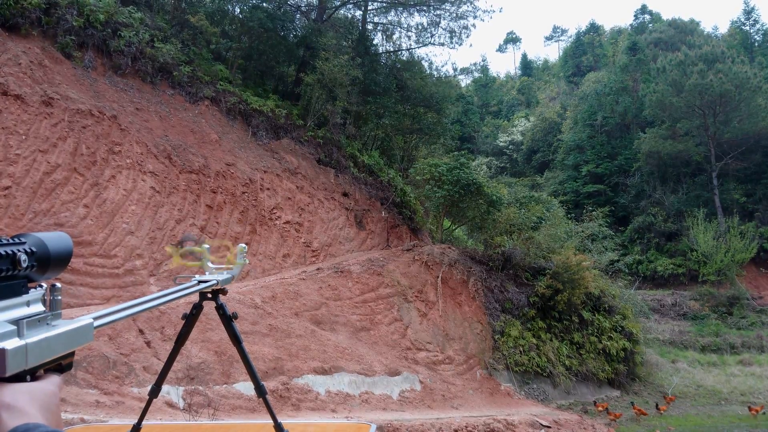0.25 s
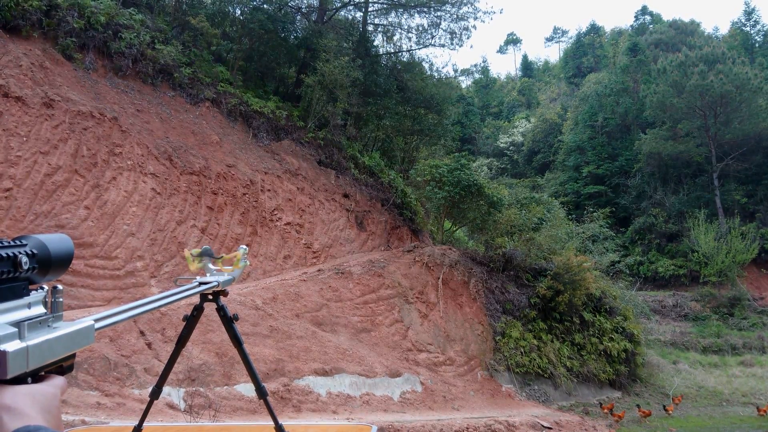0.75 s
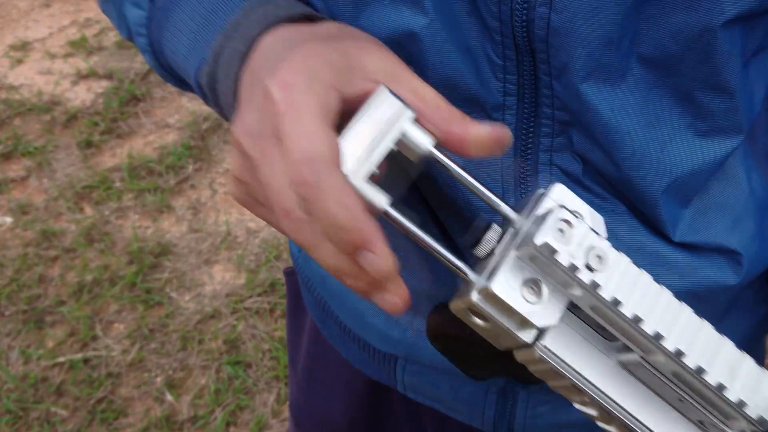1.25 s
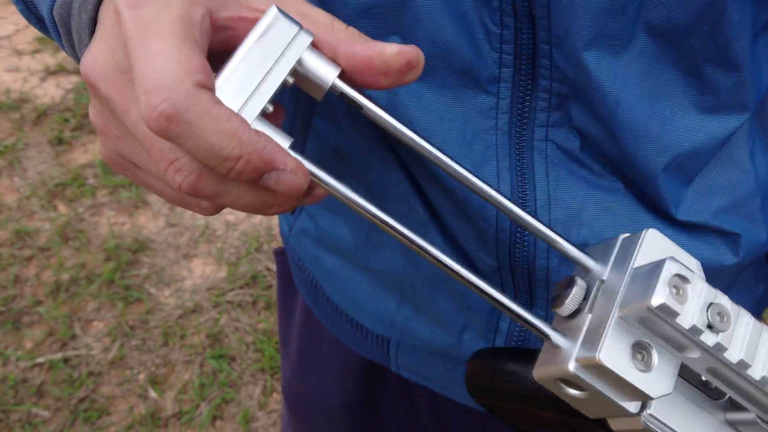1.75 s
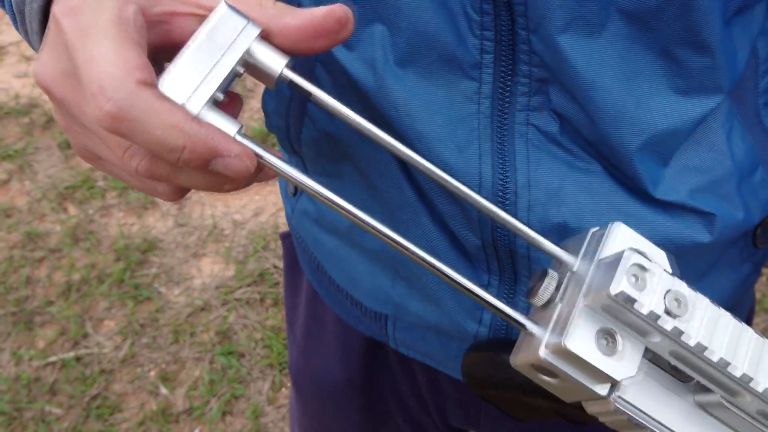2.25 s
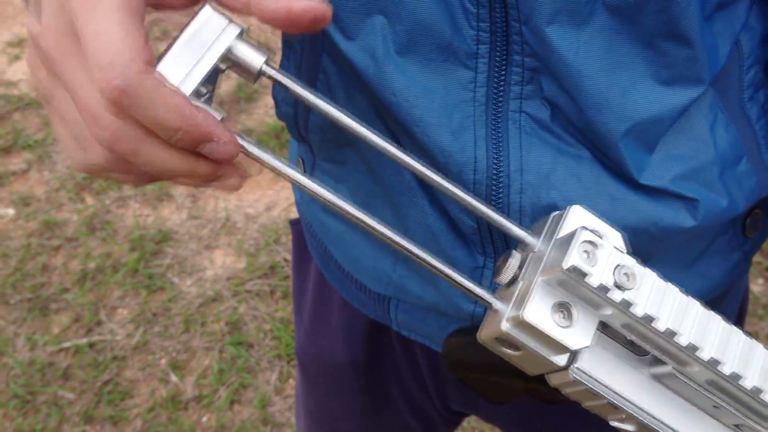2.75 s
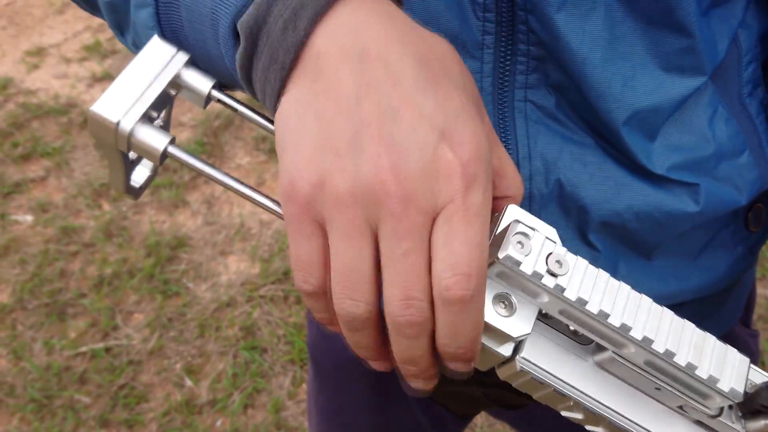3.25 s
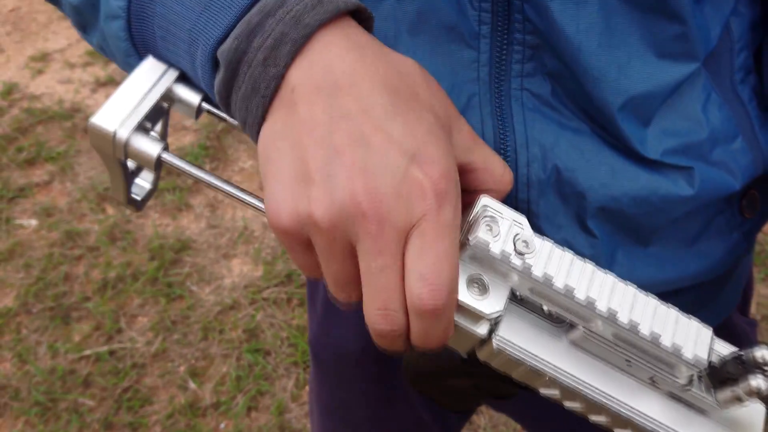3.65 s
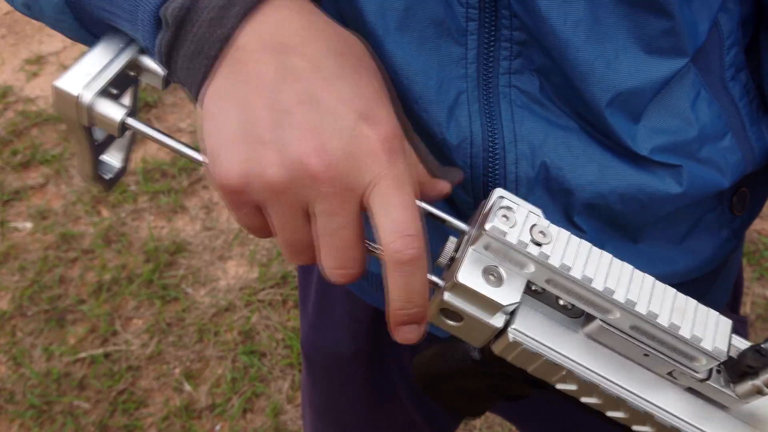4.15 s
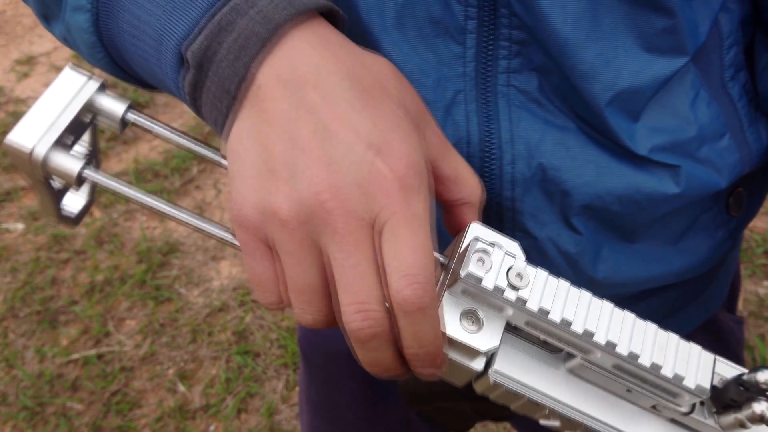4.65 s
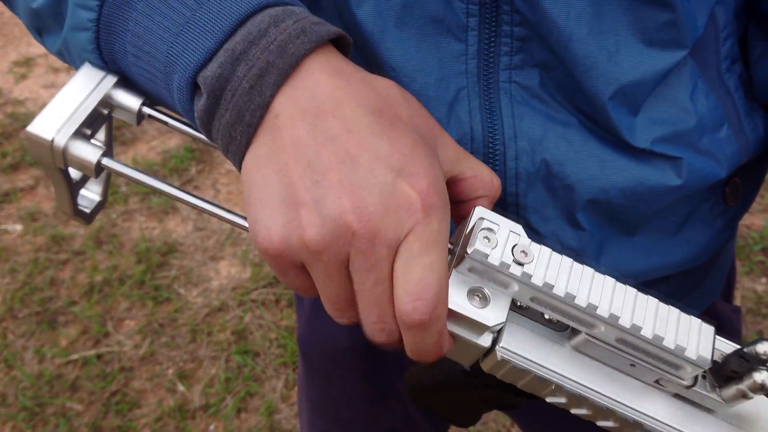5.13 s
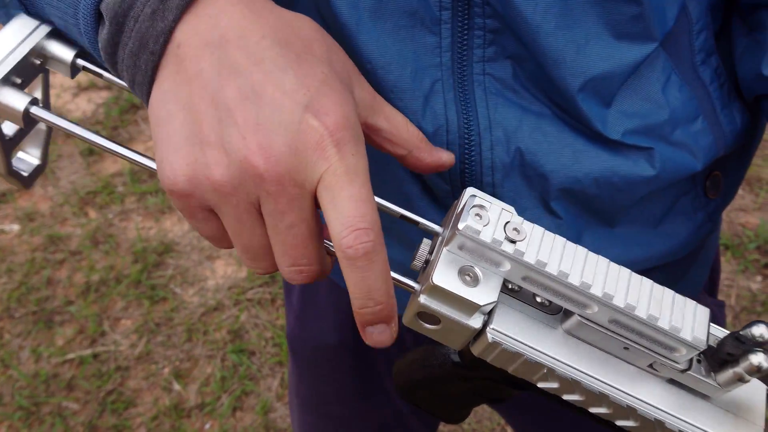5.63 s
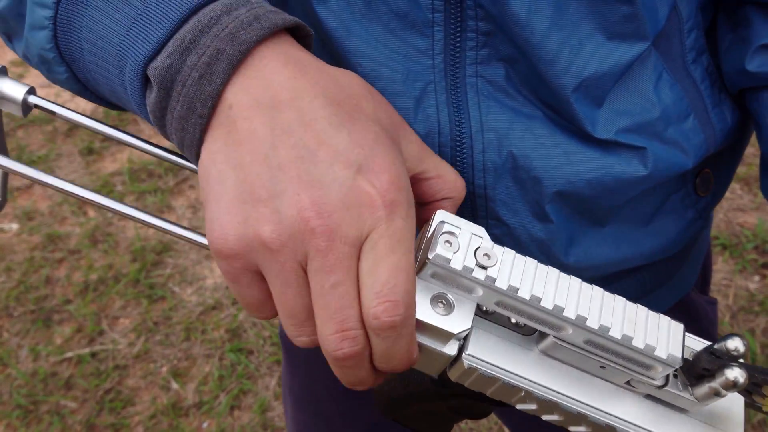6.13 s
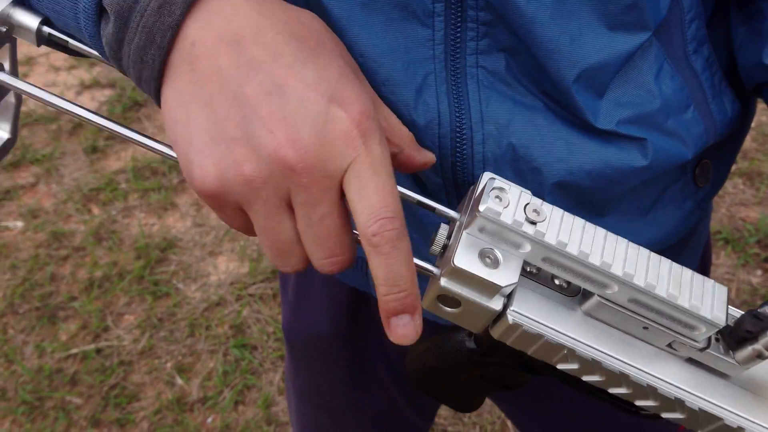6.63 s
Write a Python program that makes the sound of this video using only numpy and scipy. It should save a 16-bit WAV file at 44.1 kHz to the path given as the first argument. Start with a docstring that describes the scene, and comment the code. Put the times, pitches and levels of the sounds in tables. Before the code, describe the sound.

At 0 s slack rubber bands release close by: a low twang near 190 Hz, swelling and dying within a tenth of a second, with a burst of whipping air. At 0.31 s a ball smacks a far metal plate, sharp and bright, ringing around 4 kHz while a clay bank scatters a fading echo. Faint handling comes near 0.9 s; at 1.1 s the sound dips briefly and hiss returns a little stronger. From 1.2 to 1.5 s metal scrapes, ticks and squeaks thinly. A crisp dry snap lands at 2.05 s, followed by rubbing and small ticks until 2.4 s. Then mostly quiet wind and rustling sleeves, with light taps near 3.6 s. Short scrapes lead into louder metallic clacks at 4.0, 5.3 and 6.57 s, each brief and close, with small ticks between. A faint low engine hums unsteadily from about 4.3 s to the end.

```python
"""Rubber bands twang outdoors, a ball strikes far metal, then metal parts slide, snap, tick and squeak.
A rail slingshot's release is swelling tones and noise; the plate rings and a clay bank scatters it back.
Hands slide an aluminium stock along two rods: grainy noise and rattles, coloured by the metal's ringing.
Wind on the microphone ports and camera hiss are shaped noise; a far engine, heard later, is a few sine
tones. The whole level dips briefly near 1.1 s, where the steady hiss also steps up."""
import sys
import numpy as np
from scipy import signal
from scipy.fft import rfft, irfft, next_fast_len
from scipy.io import wavfile
from scipy.ndimage import uniform_filter1d, map_coordinates

SR = 44100
rng = np.random.default_rng(int(sys.argv[2]) if len(sys.argv) > 2 else 0)


def log_audio(samples):
    """Write samples as a 16-bit WAV file to the path given in sys.argv[1]."""
    # one column per channel
    frames = np.atleast_2d(samples).T
    # limit to full scale, then quantise
    limited = np.clip(frames, -1, 1)
    pcm = np.round(limited * 32767).astype(np.int16)
    wavfile.write(sys.argv[1], SR, pcm)


N = 303760  # length of the sound [samples]

# The brief dip in level: (bottom reached [s], rise begins [s])
DIP = (1.102, 1.118)
# Ringing of the stock and rods: (pitch [Hz], relative level [dB], time to fall 60 dB [s])
STOCK_MODES = [(485, -20, 0.088), (647, -18.5, 0.12), (777, -32, 0.35), (1138, -21.5, 0.13),
               (1415, -21.5, 0.14), (1601, -6.5, 0.039), (1814, -23, 0.07), (1962, -5, 0.053),
               (2355, -11.5, 0.063), (2624, -19, 0.084), (3170, -17, 0.041), (3700, -40, .17),
               (3890, -18, .055), (4190, -15.5, 0.021), (4700, -14.5, 0.039), (4800, -17.5, 0.06),
               (5400, -22, .03), (7940, -30.5, 0.057), (10700, -24, .035)]
# Colour of metal rubbing and of ticks: (frequency [Hz], relative level [dB per Hz])
SCRAPE_COLOUR = [(180, -41), (300, -10), (406, -14.5), (541, -3), (784, -10), (975, -7), (1510, -8),
                 (1640, -1.5), (3280, -7.5), (4910, -6), (7240, -24.5), (10300, -13), (14200, -15),
                 (16000, -26), (16800, -71)]


def amp(db):
    """Turns a level in dB into a plain multiplier."""
    return 10 ** (np.asarray(db) / 20)


def unit(x):
    """Scales x to an average strength (rms) of 1."""
    return x / np.sqrt(np.mean(x ** 2) + 1e-20)


def along(points, hz):
    """Reads a (frequency, value) table between its points, on a log frequency axis."""
    f, v = np.transpose(points)
    return np.interp(np.log(hz + 1), np.log(f + 1), v)


def curves(rows, outside=None):
    """Draws one value per sample for each column after the time."""
    s, *cols = np.transpose(rows)
    return [np.interp(np.arange(N) / SR, s, c, outside, outside) for c in cols]


def wobble(rate):
    """Makes a smooth random curve with rate random points a second."""
    knots = rng.standard_normal(int(N * rate / SR) + 4)
    return map_coordinates(knots, [np.arange(N) * rate / SR])


def fade(db, t60):
    """Makes a level that dies away from the start, falling 60 dB in t60 seconds."""
    return amp(db - 60 * np.arange(N) / SR / t60)


def sides(pan_db):
    """Gives left and right gains whose difference is pan_db."""
    return amp([[pan_db / 2], [-pan_db / 2]])


def add(track, s, piece):
    """Mixes a piece into a track at time s, cutting off what runs past the end."""
    at = round(s * SR)
    track[..., at:at + piece.shape[-1]] += piece[..., :track.shape[-1] - at]


def filtered(x, response):
    """Filters x by multiplying its spectrum by a response of frequency."""
    m = 2 * next_fast_len(N // 2 + SR // 2)  # spare room so that ringing does not wrap to the start
    return irfft(rfft(x, m) * response(np.fft.rfftfreq(m, 1 / SR)), m)[..., :N]


def causal(points, hz):
    """Makes a filter of the given colour that answers only after a blow (minimum phase), mean power 1."""
    cepstrum = irfft(np.maximum(along(points, hz), -60) * np.log(10) / 20)
    # folding the second half onto the first puts the answer after the blow
    cepstrum[1:len(cepstrum) // 2] *= 2
    cepstrum[len(cepstrum) // 2 + 1:] = 0
    h = np.exp(rfft(cepstrum))
    return h / np.sqrt(np.mean(np.abs(h) ** 2))


def ringing(modes, hz):
    """Adds up the responses of damped vibrations, each set swinging by a blow."""
    total = 0
    for k, (centre, db, t60) in enumerate(modes):
        damping = 1j * hz * np.log(1000) / np.pi / t60
        strength = (-1) ** k * amp(db) * SR / np.pi * centre
        total = total + strength / (centre * centre - hz * hz + damping)
    return total / 2


def pair(alike):
    """Makes left and right white noise, as alike at each frequency as the table says."""
    def turn(hz):
        return np.arccos(np.clip(along(alike, hz), -1, 1)) / 2

    mid, side = filtered(rng.standard_normal((2, N)),
                         lambda hz: np.array([np.cos(turn(hz)), np.sin(turn(hz))]))
    return np.array([mid + side, mid - side])


def burst(t60, rise):
    """Shapes one rattling contact: a quick rise, then a fall of 60 dB in t60 seconds."""
    t = np.arange(SR // 8) / SR
    return amp(-60 * t / abs(t60)) * (1 - np.exp(-t / rise)) ** 2.7


def air():
    """Wind rumbles on the ports under camera hiss; the release's echo dies away and sleeves rustle."""
    # wind, before gusts and the overall gain: (time [s], deep rumble level [dB], low rumble level [dB])
    wind_levels = [(0.0, -61, -70), (0.55, -60.5, -72), (0.92, -56.5, -68.5), (1.3, -77.5, -72.5),
                   (1.6, -69, -69.5), (3.1, -72, -70.5), (3.4, -67.5, -73.5), (3.9, -72.5, -69.5),
                   (4.3, -63.5, -72.5), (4.8, -64, -69.5), (5.18, -72, -69.5), (5.6, -63.5, -66),
                   (6.35, -66.5, -69.5), (6.6, -64, -59.5), (6.89, -59, -69)]
    # colour of the rumble: (frequency [Hz], relative level [dB per Hz])
    rumble_colour = [(12, -54.5), (20, -18.5), (34, -10), (54, 3), (92, -4), (127, -5.5), (182, -12.5),
                     (600, -26), (780, -42), (1320, -120)]
    # colour of the hiss: (frequency [Hz], relative level [dB per Hz])
    hiss_colour = [(180, -33), (300, -13), (532, -8.5), (588, -11), (640, -9.5), (927, -7.5), (1060, -5),
                   (2050, -6.5), (2260, -9), (3220, -12.5), (5530, -14.5), (8280, -27), (14700, -13),
                   (15700, -17.5), (16800, -42.5)]
    # likeness of the noise at the two ports: (frequency [Hz], left-right likeness [-1 to 1])
    port_likeness = [(60, .88), (300, 0.44), (1400, 0), (15000, 0)]
    # steady hiss before its wobble: (level until the dip [dB], level from then on [dB])
    hiss_levels = (-78, -74)
    # sleeve rustles before the wobble: (middle [s], level [dB], slope on either side [dB/s])
    sleeve_moves = [(1.33, -58.5, 44.5), (2.19, -64.5, 45.5), (3.09, -73, 30.5), (4.03, -62, 60.5),
                    (5.42, -68.5, 29), (6.6, -63.5, 54)]

    def deep_part(hz):
        return 1 / (1 + (hz / 92) ** 8)

    t = np.arange(N) / SR
    deep_db, low_db = curves(wind_levels)
    noise = pair(port_likeness)
    deep = unit(filtered(noise, lambda hz: amp(along(rumble_colour, hz)) * deep_part(hz)))
    low = unit(filtered(noise, lambda hz: amp(along(rumble_colour, hz)) * (1 - deep_part(hz))))
    hiss = unit(filtered(pair(port_likeness), lambda hz: amp(along(hiss_colour, hz))))
    # rumble and hiss of the release echo die away
    deep_level = amp(deep_db) + fade(-42.5, 0.34)
    low_level = amp(low_db) + fade(-36.5, 0.6)
    echo_hiss = fade(-40.5, 0.55) + fade(-58, 1.7)  # a fast fade with a slow end
    rustle = sum(amp(db - slope_db * np.abs(t - s)) for s, db, slope_db in sleeve_moves)
    hiss_level = amp(np.where(t < DIP[0], *hiss_levels)) + echo_hiss + rustle
    gust = amp(2.5 * wobble(7))
    rumble = deep_level * deep + low_level * low
    return amp(0.68) * sides(3.2) * gust * rumble + hiss_level * amp(0.34 * wobble(5.1)) * hiss


def release():
    """Slack bands flap, each swing swelling and dying as a tone, while pouch and air hiss away."""
    # flapping bands: (pitch [Hz], peak level before panning [dB], half the time to the peak [s])
    band_swings = [(189.6, -18, .009), (312.8, -31.5, .015), (500, -31, 0.0054), (773.5, -30, 0.0018),
                   (118, -32.5, .01), (40, -41, .012), (81, -35, 0.012)]
    # colour of the air and pouch noise: (frequency [Hz], relative level [dB per Hz])
    whip_colour = [(180, -27), (300, -4), (497, -9.5), (708, -18), (784, -9.5), (992, -17.5), (1300, -8.5),
                   (2420, -16), (5910, -17), (7120, -25), (13000, -16), (15700, -28), (16800, -70)]
    # air and pouch noise before its wobble: (time [s], level [dB])
    whip_levels = [(0.0, -21), (0.046, -32.5), (0.09, -56.5), (0.28, -69.5)]
    t = np.arange(N) / SR
    twang = np.zeros(N)
    for k, (hz, db, swell) in enumerate(band_swings):
        stage = t / swell / 2  # reaches 1 at the peak of the swing
        shape = (stage * np.exp(1 - stage)) ** 2
        twang += amp(db) * shape * np.sin(2 * np.pi * hz * t - 1.9 * k - 1.6)
    noise = pair([(300, 0.95), (2000, 0.47), (8000, .1)])
    whip = unit(filtered(noise, lambda hz: amp(along(whip_colour, hz))))
    level = amp(curves(whip_levels, outside=-120)[0] + 4.4 * wobble(150))
    add(level, .003, amp(-18) * burst(0.0075, 0.0012))  # a short extra puff
    return twang * sides(2.4) + whip * level


def strike():
    """The ball smacks the plate, whose vibrations ring on; the bank scatters the sound back."""
    # a faint tick, the ball's hit, then a short sharp echo:
    # (time [s], relative level [dB], rattle's time to fall 60 dB [s])
    hit_sounds = [(0.2903, -48, 0.065), (0.313, -17, .065), (0.3286, -22, 0.013)]
    # the struck plate: (pitch [Hz], relative level [dB], time to fall 60 dB [s])
    plate_modes = [(2630, -15, 0.042), (3905, -19, .2), (4158, -12, 0.4), (4352, -12.5, .55),
                   (4178, -20, 0.3), (4390, -19, 0.42), (4990, -24, .3), (4912, -25, .3),
                   (5512, -14, 0.041), (5946, -22.5, 0.26), (11030, -28, .15), (11634, -28, 0.2)]
    # broad colour of the strike: (frequency [Hz], relative level [dB per Hz])
    smack_colour = [(120, -68), (200, -38), (1250, -27.5), (1430, -20), (2400, -11.5), (3540, -14),
                    (4260, -4.5), (4590, -6.5), (6530, -18.5), (7030, -26), (11600, -16.5), (15300, -24.5),
                    (16800, -59.5)]
    # the bank's answer: (frequency [Hz], time to fall 60 dB [s])
    bank_decay = [(500, 0.18), (2000, 0.49), (4500, .9), (8000, 0.64), (15000, .38)]
    rattle, clicks = np.zeros(N), np.zeros(N)
    for s, db, t60 in hit_sounds:
        add(rattle, s, amp(db) * burst(t60, 0.00026))
        clicks[round(s * SR)] = amp(db + 16)
    blows = clicks + rattle * pair([(1500, 0.888), (5000, 0.72), (9000, .1)])
    smack = amp(3.5) * filtered(blows, lambda hz: causal(smack_colour, hz))
    plate = amp(-21.5) * filtered(clicks, lambda hz: ringing(plate_modes, hz)) * sides(1.1)
    near = smack + plate
    # noise that dies at a different speed at each frequency
    hz, t, z = signal.stft(rng.standard_normal((2, SR)), SR, nperseg=256)
    dying = z * amp(-60 * t / along(bank_decay, hz)[:, None])
    tail = signal.istft(dying, SR, nperseg=256)[1]
    # bushes and stones next to the plate send a quick bright scatter first
    bright_noise = np.diff(rng.standard_normal(tail.shape), prepend=0)
    quick = bright_noise * amp(-60 * np.arange(tail.shape[1]) / SR / .13)
    answer = amp(-12) * tail / np.linalg.norm(tail[0]) + amp(-8.5) * quick / np.linalg.norm(quick[0])
    add(near, 0, signal.fftconvolve(near[:, :SR], answer, axes=1))
    return near


def slide():
    """Rods and hands rub: grainy noise sets the metal ringing, with its own brightness in each stroke."""
    # (start [s], rise [s], hold [s], fall [s], level of the low part [dB], treble above that level [dB])
    strokes = [(.85, 0.022, 0.031, .06, -68, 9), (1.10, 0.031, 0.089, .06, -62, 2.5),
               (1.2, .06, 0.059, .05, -53.5, 10.5), (1.3, 0.034, 0.036, .06, -52.5, 6),
               (1.37, 0.021, 0.047, .1, -59.5, 6.5), (1.88, 0.21, .012, .004, -61, -2.5),
               (2.058, .14, 0.044, .04, -65, -10), (2.229, 0.026, 0.048, .035, -54.5, -3),
               (2.3, 0.021, .015, .13, -59.5, -10), (2.8, 0.18, .12, .18, -70.5, 0.06),
               (3.83, 0.034, 0.049, .014, -61.5, 7.5), (3.932, .008, 0.057, .011, -61.5, 4.5),
               (3.97, .033, .006, .004, -53.5, -3.5), (5.232, 0.0055, .014, .03, -60, 11.5),
               (5.25, 0.054, .011, .004, -50.5, 0.95), (5.8, 0.095, .03, .04, -61.5, -8),
               (6.09, 0.042, 0.022, .08, -65, -4.5), (6.465, .018, 0.027, .03, -60, -4),
               (6.513, 0.007, .015, .012, -58, 3), (6.542, 0.00594, .021, .004, -47.5, 5.5),
               (6.586, .011, 0.036, .06, -56, -5)]
    level, bright = np.zeros(N), np.zeros(N)
    for start, rise, hold, fall, peak_db, bright_db in strokes:
        full, until, end = start + np.cumsum([rise, hold, fall])
        # a stroke starts 14 dB and ends 18 dB under its peak
        shape = [(start, peak_db - 14), (full, peak_db), (until, peak_db), (end, peak_db - 18)]
        db, = curves(shape, outside=-120)
        level += amp(db)
        bright += amp(db + bright_db)
    grain = amp(2.5 * wobble(300) + 0.8 * wobble(50))
    grit = grain * pair([(800, 0.89), (3000, 0.61), (8000, 0.041)])
    rub = unit(filtered(grit, lambda hz: causal(SCRAPE_COLOUR, hz)
                        + amp(-32.0) * ringing(STOCK_MODES, hz)))
    low = filtered(rub, lambda hz: 1 / (1 + (hz / 3500) ** 4))
    return level * low + bright * (rub - low)


def catch():
    """The catch snaps and drags over notches: short rattles whose spot on the rods decides what rings."""
    # (time [s], relative level [dB], thud, edge and top against that level [dB each],
    #  struck spot [0-1], left-right difference [dB])
    notch_hits = [(0.874, -49.5, 2, 20.5, 7, .3, 0), (0.89, -59.5, -12, 22, 7, .2, 5.5),
                  (1.2372, -28.5, -16, 8, -10.5, .06, 2.5), (1.34, -37.5, 11, 12, -6.5, .25, -6),
                  (1.3693, -29.5, -11, 3, -9, .2, -0.5), (2.0535, -11.5, -9, 4.5, 6, .29, 0),
                  (3.575, -41, -7.5, 11.5, -2, .2, -1.5), (3.9473, -35, -15, 7.5, 0.2, .3, -3),
                  (4.006, -6.5, -12.5, 0.8, -0.1, .31, 1), (4.9375, -42, -3.5, 13, -0.5, .2, -1.5),
                  (5.235, -39.5, -6.5, 8.5, -0.5, .06, -7), (5.2666, -27, -8.5, 7.5, 1.4, .24, -2),
                  (5.2854, -28, -16, 10.5, 0.1, .27, -5), (5.3074, -4.5, -11.5, 3, 3, .44, -1.13),
                  (6.4812, -33.5, -18, 1, -21.5, .3, -5.5), (6.494, -42.5, -5.5, 9, 2, .3, -1.5),
                  (6.5192, -32.5, -9, 5, 2.5, .28, -1), (6.5429, -23, -16, 3.5, 4, .4, -2.5),
                  (6.567, -2.5, -14.5, -1.5, 5, .42, -0.1), (6.592, -32.5, -1.5, 2.5, 1.5, .3, -1)]
    # broad colour of a contact: (frequency [Hz], relative level [dB per Hz])
    snap_colour = [(59, -59.5), (100, -27), (325, -8.5), (568, -9), (783, -6), (991, -3), (1370, -11.5),
                   (1660, -2), (3510, -12.5), (4950, -10), (7280, -18.5), (9220, -18.5), (10700, -10),
                   (15100, -17), (16800, -34)]
    force, ring = np.zeros((4, 2, N)), np.zeros((2, N))  # four bands of force: thud, body, edge, top
    t = np.arange(SR // 4) / SR
    hz, mode_db, mode_t60 = np.transpose(STOCK_MODES)[:, :, None]
    order = np.arange(1, len(STOCK_MODES) + 1)[:, None]
    for s, db, thud_db, edge_db, top_db, spot, pan_db in notch_hits:
        t60 = .037 + .00025 * db  # [s] softer snaps are shorter
        levels = amp(db + np.array([thud_db, 0, edge_db, top_db]))
        # the treble of the rattle dies sooner
        shapes = np.array([burst(t60 * k, .0016) for k in (0.88, 0.87, 0.8, 0.63)])
        add(force, s, (levels[:, None] * shapes)[:, None] * sides(pan_db))
        band_level = levels[np.searchsorted([1150, 3400, 7500], hz)]
        share = (0.18 + np.abs(np.sin(np.pi * spot * order))) * band_level
        # the higher the mode, the less its phase agrees between the ports
        phase = rng.uniform(0, 2 * np.pi, hz.shape) + rng.standard_normal((2,) + hz.shape) * hz / 2600
        modes = share * amp(mode_db - 60 * t / mode_t60) * np.sin(2 * np.pi * hz * t + phase)
        swell = 1 - np.exp(-t / 0.0045)
        add(ring, s, amp(-4) * modes.sum(1) * swell * sides(pan_db))
    edges = [np.log(370), np.log(1150), np.log(3400), np.log(7500), 20]  # band edges, log Hz; 20 = no top

    def step(hz, edge):
        return 1 / (1 + np.exp(-12 * (np.log(hz + 1) - edge)))

    noise = pair([(800, 0.35), (1800, 0.45), (3000, 0.4), (8000, 0.17)])
    push = sum(filtered(f * noise, lambda hz: step(hz, edges[k]) - step(hz, edges[k + 1]))
               for k, f in enumerate(force))
    # the hands take a dull jolt
    push = push + amp(-9.0) * filtered(force[0] * noise, lambda hz: 1 - step(hz, edges[0]))
    return ring + amp(1.5) * filtered(push, lambda hz: causal(snap_colour, hz))


def ticks():
    """Fingers and loose parts tick: each is a short tone at one pitch inside a puff of noise."""
    # (time [s], relative level [dB], pitch [Hz], left-right difference [dB])
    tick_list = [(0.951, -54.5, 1550, 8), (0.968, -59.5, 3530, 5), (1.197, -38, 4840, -10.5),
                 (1.21, -38, 4650, 1), (1.226, -40, 2030, -5), (1.382, -41, 5920, 6),
                 (1.819, -52, 2080, -12), (2.219, -44.5, 2410, -7), (2.272, -33.5, 1170, -11),
                 (2.3017, -42, 2230, -9), (2.333, -43, 440, 0), (2.336, -41, 1780, -13),
                 (2.847, -51, 1280, -3.5), (2.961, -46.5, 523, -5), (3.603, -57, 466, -5),
                 (3.78, -47.5, 570, -4), (5.489, -44.5, 2260, -2), (5.643, -53, 1133, -8),
                 (5.683, -50, 1570, -9), (5.919, -37.5, 1890, 6), (6.131, -53, 1930, -6),
                 (6.147, -52, 1897, -3), (6.871, -49.5, 1880, 3)]
    tone, puff = np.zeros((2, N)), np.zeros((2, N))
    t = np.arange(SR // 8) / SR
    t60 = 0.0093  # [s] fall of the tone by 60 dB
    for s, db, hz, pan_db in tick_list:
        cycles = burst(t60, 0.00026) * np.sin(2 * np.pi * hz * t)
        add(tone, s, amp(db + 1.5) * cycles * sides(pan_db))
        add(puff, s, amp(db + 0.5) * burst(1.2 * t60, 0.00073) * sides(pan_db))
    puff = puff * pair([(800, 0.87), (3000, 0.45), (8000, 0.0053)])
    return tone + filtered(puff, lambda hz: causal(SCRAPE_COLOUR, hz) / (1 + 1j * hz / 6000) ** 2)


def nearby(x):
    """The holder's body and the ground return a short, slightly dull blur, made from fading noise."""
    blur = rng.standard_normal((2, SR // 8)) * amp(-60 * np.arange(SR // 8) / SR / 0.11)
    back = signal.oaconvolve(x, blur / np.linalg.norm(blur[0]), axes=1)[:, :N]
    return x + amp(-16.0) * filtered(back, lambda hz: 1 / (1 + 1j * hz / 4500))


def squeaks():
    """Metal rubbing on metal whistles thinly: narrow gliding bands of noise swell and fade."""
    # (start [s], end [s], start pitch [Hz], end pitch [Hz], level before the swell [dB])
    whistles = [(1.249, 1.335, 5388, 4220, -47.5), (1.303, 1.435, 5650, 5770, -50.5),
                (1.321, 1.48, 1710, 1697, -59), (1.697, 2.05, 5840, 5605, -73),
                (4.194, 4.3, 1350, 1307, -67), (5.676, 5.896, 1310, 1312, -68.5)]
    out = np.zeros((2, N))
    span = int(SR / 260 / 2)  # smoothing length for a band roughly 260 Hz wide
    for s, end, hz, end_hz, db in whistles:
        n = round((end - s) * SR)
        turn = 2 * np.pi * np.cumsum(np.linspace(hz, end_hz, n)) / SR
        noise = rng.standard_normal((2, 2, SR))[..., :n]
        a, b = uniform_filter1d(uniform_filter1d(noise, span), span)  # slow noise widens the tone
        whistle = unit(a * np.sin(turn) + b * np.cos(turn))
        add(out, s, amp(db) * np.sqrt(np.hanning(n)) * whistle)
    return out


def engine():
    """A far engine hums: an unsteady firing tone with weak overtones at whole multiples."""
    # before wobbles and overtone gains: (time [s], firing pitch [Hz], level [dB])
    firing = [(4.17, 51.89, -79.5), (4.35, 51.77, -62), (4.63, 57.9, -59.5), (4.9, 60.15, -59.5),
              (5.34, 63.93, -71), (5.51, 63.4, -61), (6.2, 63.77, -63), (6.46, 56, -61), (6.62, 56, -58),
              (6.89, 55.9, -56.5)]
    hz, _ = curves(firing)
    db = curves(firing, outside=-120)[1]
    turn = 2 * np.pi * np.cumsum(hz * (1 + .01 * wobble(4.3))) / SR
    orders = [(1, 5), (2, -7), (3, -20), (4, -19)]  # (multiple of the firing pitch, gain [dB])
    hum = sum(amp(g + 1.7 * wobble(17)) * np.sin(k * turn) for k, g in orders)
    return amp(db) * hum * sides(3)


def scene():
    """Mixes all sources and turns them down together through the brief dip."""
    t = np.arange(N) / SR
    falling, rising = (DIP[0] - t) / .002, (t - DIP[1]) / 0.011  # fall in 2 ms, rise in 11 ms
    live = np.clip(np.maximum(falling, rising), .05, 1)
    handling = slide() + nearby(catch() + ticks()) + squeaks()
    return live * (air() + release() + strike() + handling + engine())


def record(dry):
    """The camera keeps nothing at or above its band limit of 16900 Hz."""
    return filtered(dry, lambda hz: hz < 16900)


dry = scene()
out = record(dry)
log_audio(out)
```